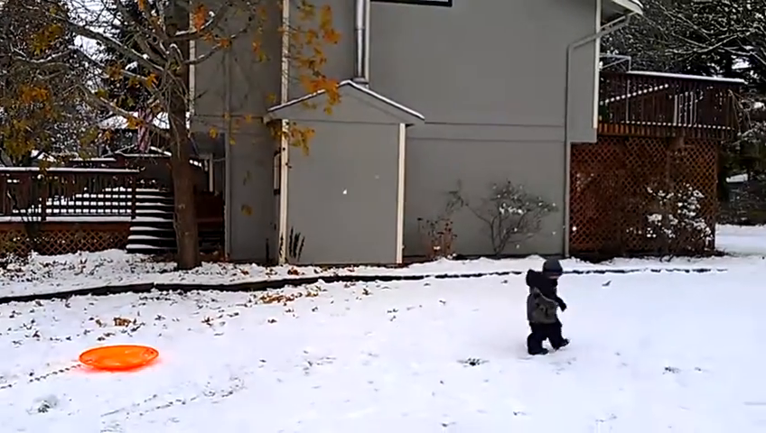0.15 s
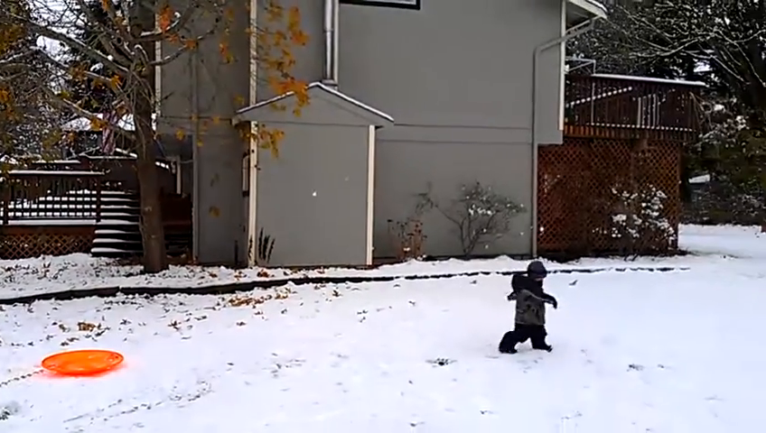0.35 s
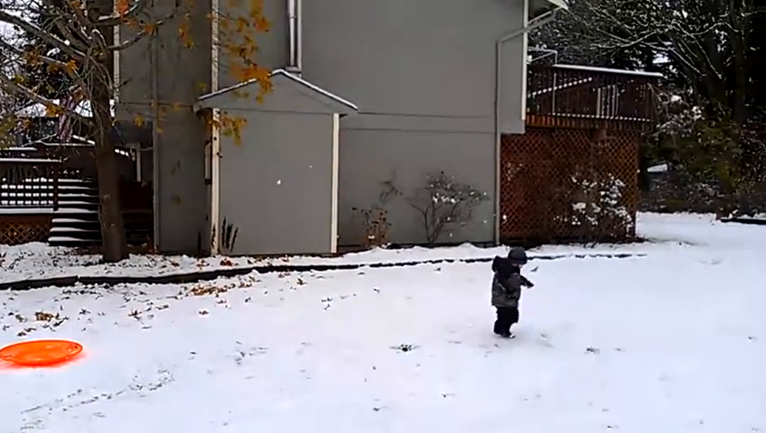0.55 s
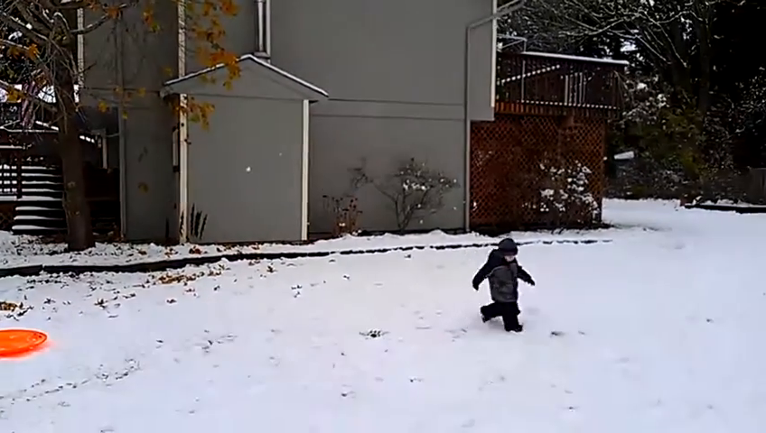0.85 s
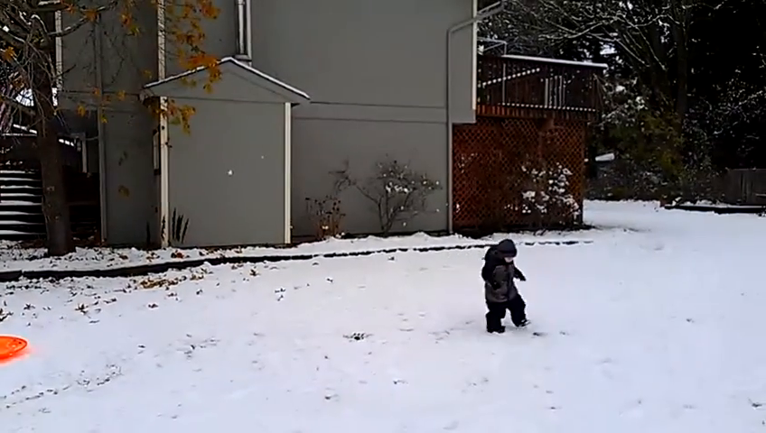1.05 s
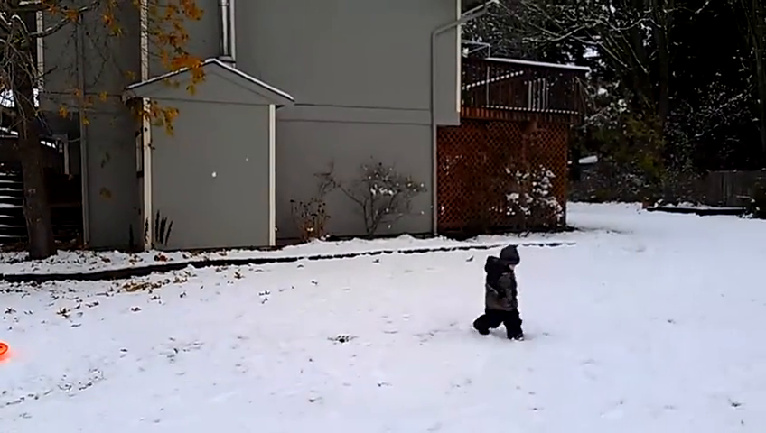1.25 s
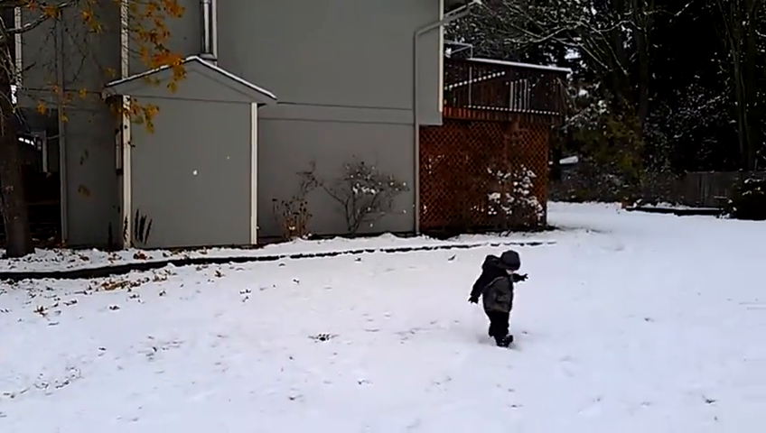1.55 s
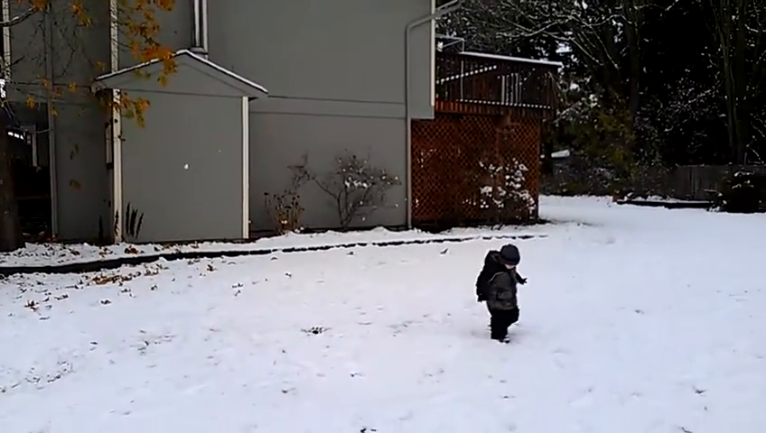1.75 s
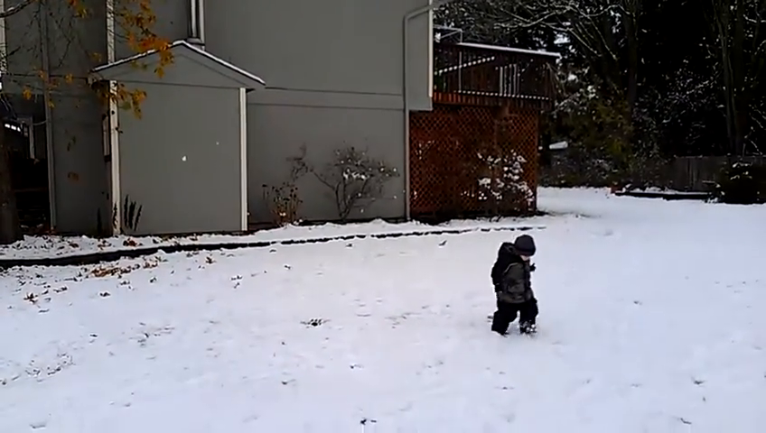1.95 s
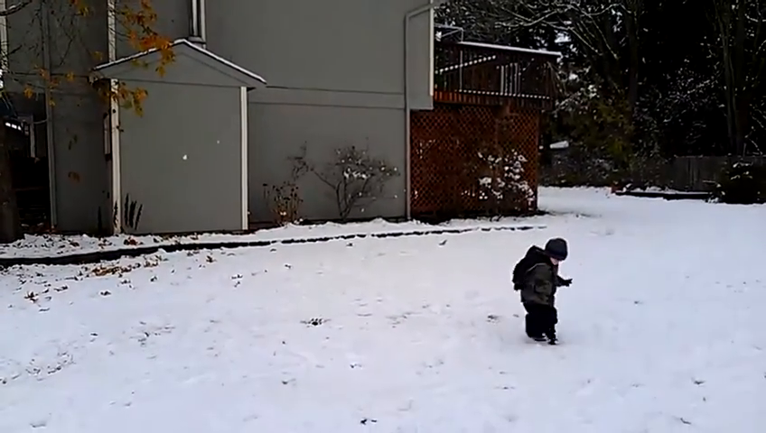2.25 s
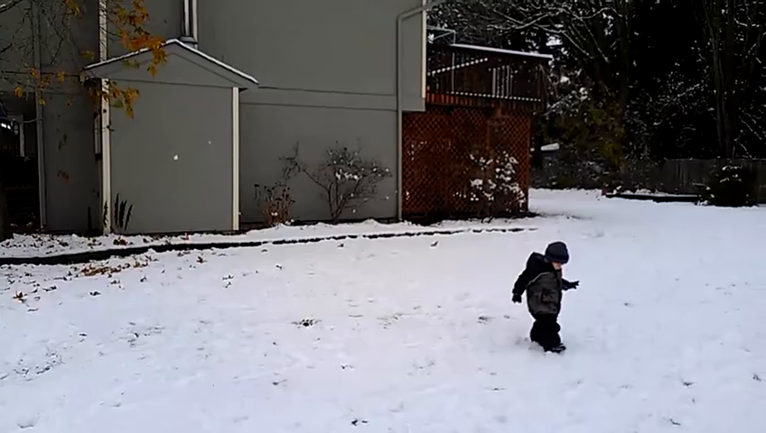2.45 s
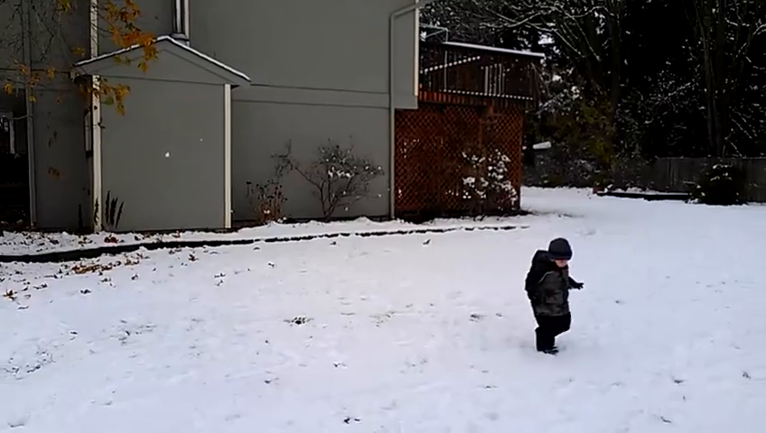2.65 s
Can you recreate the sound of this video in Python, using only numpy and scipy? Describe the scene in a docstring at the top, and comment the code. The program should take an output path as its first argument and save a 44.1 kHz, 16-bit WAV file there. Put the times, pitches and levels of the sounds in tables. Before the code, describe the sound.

Boots press and drag in crisp snow at irregular intervals, crackling and creaking above quiet distant air

```python
"""Uneven footsteps in a snowy yard, close to a hand-held pair of microphones.
Each press or drag of a boot breaks a swarm of tiny ice grains, over the muffled packing of the snow.
Patches of crust collapse in tight bursts, packed snow creaks in narrow bands of noise, and a sole
squeaks in short unsteady tones. A few soft knocks are damped modes; a steady distant outdoor rush
is coloured noise."""
import sys
import numpy as np
from scipy import signal
from scipy.fft import rfft, irfft, next_fast_len
from scipy.io import wavfile
from scipy.ndimage import uniform_filter1d, map_coordinates

SR = 44100
rng = np.random.default_rng(int(sys.argv[2]) if len(sys.argv) > 2 else 0)


def inscribe(sig):
    """Save sig as 16-bit PCM at rate SR to the path in sys.argv[1].

    A 1-D sig is mono; a 2-D sig holds one channel per row.
    Samples are clipped to [-1, 1] before scaling.
    """
    pcm = np.round(np.clip(np.atleast_2d(sig).T, -1, 1) * 32767)
    wavfile.write(sys.argv[1], SR, pcm.astype(np.int16))


N = 123479
T = np.arange(N) / SR  # seconds

# Colour of the coarse crunch of snow. Each row: frequency in Hz, relative level in dB per Hz.
CRUNCH_COLOUR = [(120, -52), (250, -39), (700, -8.5), (1200, -6), (2100, -0.5), (3300, 0.5), (4600, 0.5),
                 (6000, -1.5), (9000, -5.5), (11000, -29.5)]
# How alike the yard and the muffled packing of the snow reach left and right.
# Each row: frequency in Hz, likeness (1 is identical).
WIDE_LIKENESS = [(50, 0.14), (110, .3), (200, 1), (400, 0.71), (800, 0.79), (2000, 0.19), (8000, 0.41)]
# How alike the breaking snow underfoot reaches left and right.
# Each row: frequency in Hz, likeness (1 is identical).
SNOW_LIKENESS = [(400, 0.98), (1500, 1), (3000, 0.28), (4500, 0.56), (6300, 1), (8000, 0.47), (10000, 0.24)]


def amp(db):
    """Decibels to gain."""
    return 10 ** (np.asarray(db) / 20)


def unit(x):
    """Scaled to rms 1."""
    return x / np.sqrt(np.mean(x ** 2) + 1e-20)


def along(points, hz):
    """(Hz, value) points read on a log frequency axis."""
    f, v = np.transpose(points)
    return np.interp(np.log(hz + 1), np.log(f + 1), v)


def wobble(rate):
    """A smooth random curve through normally scattered knots, rate of them a second."""
    return map_coordinates(rng.standard_normal(4096), [T * rate], mode="wrap")


def swell(centre, length):
    """A brief bell-shaped rise and fall, 17 dB down one length either side of its centre."""
    return np.exp(-2 * ((T - centre) / length) ** 2)


def filtered(x, response):
    """x times a response of frequency, padded so that the end does not wrap onto the start."""
    size = next_fast_len(N + SR // 2)
    spectrum = rfft(x, size) * response(np.fft.rfftfreq(size, 1 / SR))
    return irfft(spectrum, size)[..., :N]


def spread(pair, colour, alike):
    """Two unrelated signals mixed as mid and side into a coloured, partly alike left and right of rms 1."""
    def mid_side_response(hz):
        # a wider angle moves energy from mid to side, so left and right grow less alike
        angle = np.arccos(np.clip(along(alike, hz), -1, 1)) / 2
        return colour(hz) * np.array([np.cos(angle), np.sin(angle)])

    mid, side = filtered(pair, mid_side_response)
    return unit(np.array([mid + side, mid - side]))


def yard():
    """Steady distant outdoor rush: noise with a fixed colour and width."""
    # Colour of the yard. Each row: frequency in Hz, relative level in dB per Hz.
    yard_colour = [(40, -18.5), (110, -66), (145, -37), (200, -27.5), (260, -13), (480, -6), (780, 0.5),
                   (1200, -10.5), (2100, -7.5), (5000, -5), (6300, -4), (8700, -7), (10800, -18),
                   (13500, -55)]
    noise = rng.standard_normal((2, N))
    return amp(-57.5) * spread(noise, lambda hz: amp(along(yard_colour, hz)), WIDE_LIKENESS)


def knocks():
    """Soft dull bumps: a quickly damped mode and a shorter overtone, with little below the mode."""
    # Soft knocks among the steps. Each row: start in seconds, pitch in Hz, level in dB before the low cut,
    # time to fall 60 dB in seconds, overtone over mode in dB.
    knock_rows = [(0.2735, 370, -41.5, 0.026, -1), (.711, 555, -31.5, 0.015, -2),
                  (0.7355, 490, -41.5, 0.022, -12), (.954, 407, -47.5, 0.025, -10),
                  (1.275, 280, -54, 0.05, -12), (2.183, 320, -46.5, 0.042, 4),
                  (2.2075, 800, -40, .008, -10), (2.70, 650, -42.5, 0.017, -3)]
    overtone_ratio, overtone_t60_s, attack_s = 2.6, 0.0084, 0.00041
    out = np.zeros(N)
    for start, hz, db, t60, overtone_db in knock_rows:
        t = np.maximum(T - start, 0)
        mode = np.sin(2 * np.pi * hz * t) * np.exp(-np.log(1000) * t / t60)
        overtone = np.sin(2 * np.pi * hz * overtone_ratio * t) * np.exp(-np.log(1000) * t / overtone_t60_s)
        bump = (mode + amp(overtone_db) * overtone) * (1 - np.exp(-t / attack_s))
        low_cut = signal.butter(N=6, Wn=max(250, .64 * hz), btype="high", fs=SR, output="sos")
        out += amp(db) * signal.sosfilt(low_cut, bump)
    return out


def squeaks():
    """The sole sticks and slips evenly: a short tone, slightly unsteady in pitch and level."""
    # Squeaks of the sole. Each row: centre in seconds, length in seconds, pitch in Hz, level in dB.
    squeak_rows = [(1.435, .01, 1950, -54), (1.465, 0.018, 3030, -41.5), (1.48, .005, 3220, -37)]
    jitter, rough_db, wavers_per_s = 0.024, 0.5, 350  # jitter as a fraction of the pitch
    out = np.zeros(N)
    for centre, length, pitch_hz, db in squeak_rows:
        wavering_hz = pitch_hz * (1 + jitter * wobble(wavers_per_s))
        tone = np.sin(2 * np.pi * np.cumsum(wavering_hz) / SR)
        level = amp(db + rough_db * wobble(wavers_per_s))
        out += level * swell(centre, length) * tone
    return out


def patchy(x):
    """The colour of the grains shifts from moment to moment, alike in both streams."""
    patch_db = 1.5
    z = signal.stft(x, nperseg=512)[2]
    field = rng.standard_normal(z.shape[1:])  # frequency by time
    field = uniform_filter1d(field, size=4, axis=0)
    field = uniform_filter1d(field, size=4, axis=1)
    return signal.istft(z * amp(patch_db * unit(field)), nperseg=512)[1][:, :N]


def grains():
    """Two streams of tiny ice fractures of scattered size, with snaps of crust, over smooth sliding powder."""
    grains_per_s, grain_spread_db = 3500, 2
    snaps_per_s, snap_db, powder_db = 140, -8, -1  # levels against the fractures
    breaks = rng.random((2, N)) < grains_per_s / SR
    sizes = amp(grain_spread_db * np.clip(rng.standard_normal((2, N)), -2, 2))
    fractures = breaks * sizes * rng.choice([-1, 1], (2, N))
    snaps = (rng.random((2, N)) < snaps_per_s / SR) * rng.choice([-1, 1], (2, N))
    powder = rng.standard_normal((2, N))
    return patchy(unit(fractures) + amp(snap_db) * unit(snaps) + amp(powder_db) * powder)


def creaks():
    """Grains of packed snow slip under the sole and briefly ring in one narrow band."""
    # Creaks underfoot. Each row: centre in seconds, length in seconds, pitch in Hz,
    # width of the resonance (applied twice) in Hz either side, level in dB.
    creak_rows = [(.216, 0.016, 6360, 350, -48.5), (0.854, 0.027, 1900, 298, -57),
                  (1.025, 0.022, 2310, 300, -50.5), (1.047, .012, 2800, 300, -53),
                  (1.127, 0.059, 6300, 450, -41.5), (1.145, 0.0033, 6400, 500, -35.5),
                  (1.154, .005, 6300, 350, -34), (1.452, 0.024, 1430, 350, -51),
                  (1.96, .018, 6700, 400, -46), (1.992, 0.081, 6050, 160, -47.5)]
    out = np.zeros((2, N))
    for centre, length, pitch_hz, width_hz, db in creak_rows:
        def band(hz):
            damping = 2j * hz * width_hz
            return (damping / (pitch_hz ** 2 - hz ** 2 + damping)) ** 2

        out += amp(db) * swell(centre, length) * spread(grains(), band, SNOW_LIKENESS)
    return out


def collapses():
    """A patch of crust gives way at once: a tight, distinct burst of grains in a band of its own."""
    # Crust breaking under the sole. Each row: centre in seconds, length in seconds,
    # middle of the band in Hz, level in dB.
    collapse_rows = [(.359, .006, 3200, -45), (.377, .005, 7500, -46.5), (.434, .003, 2500, -43),
                     (1.112, .003, 6500, -40), (1.1205, .003, 2600, -39), (1.132, .003, 6800, -38),
                     (1.161, .002, 2000, -45), (1.222, .003, 2500, -49), (1.945, .003, 7000, -44),
                     (1.990, .004, 7000, -42), (2.025, .003, 3000, -44), (2.045, .005, 3200, -43.5),
                     (2.093, .004, 6800, -46), (2.364, .003, 2500, -50)]
    band_octaves = 0.79  # from the middle to where the bell falls to 1/e
    out, ice = np.zeros((2, N)), grains()
    for centre, length, middle_hz, db in collapse_rows:
        def band(hz):
            bell = np.exp(-(np.log2((hz + 1) / middle_hz) / band_octaves) ** 2)
            return bell * amp(along(CRUNCH_COLOUR, hz))

        out += amp(db) * swell(centre, length) * spread(ice, band, SNOW_LIKENESS)
    return out


def packing(power):
    """The snow beneath the sole settles with a muffled sound, lagging behind the crunch."""
    # Colour of packing snow. Each row: frequency in Hz, relative level in dB per Hz.
    packing_colour = [(120, -51), (200, -23), (270, -4.5), (500, -3.5), (800, 2), (1200, -6.5),
                      (2200, -1.5), (4000, -34.5), (9000, -56)]
    growth, release_s = 0.29, 0.064  # exponent on the force of the step; time constant of the power
    settling = np.abs(signal.lfilter([1], [1, -np.exp(-1 / (release_s * SR))], power))
    noise = rng.standard_normal((2, N))
    muffled = spread(noise, lambda hz: amp(along(packing_colour, hz)), WIDE_LIKENESS)
    return amp(-56.5) * unit(np.sqrt(settling) ** growth) * muffled


def pressure(start, rise, hold, fall):
    """Weight builds exponentially on the boot, holds and lets go."""
    before = np.maximum(start - T, 0)
    after = np.maximum(T - start - hold, 0)
    return np.exp(-before / rise - after / fall)


def footsteps():
    """Each press sets off coarse and fine grains, whose roughness rises and falls almost entirely together."""
    # Presses and drags of the boots. Each row: start of the hold in seconds, rise time constant in seconds,
    # hold in seconds, fall time constant in seconds, level of the coarse crunch in dB,
    # fine fizz over coarse crunch in dB.
    press_rows = [ (.01, 0.084, 0.016, 0.2, -56.5, -0.5), (.21, 0.065, .02, 0.22, -51.5, -1.5),
                  (0.356, 0.055, 0.018, 0.052, -44.5, -4), (0.411, 0.014, 0.012, 0.074, -42.3, -27),
                  (0.615, .012, 0.0028, 0.017, -54, 5), (0.656, 0.072, 0.076, 0.093, -51, 1.5),
                  (0.797, 0.033, 0.058, 0.078, -50.5, -4), (0.99, 0.079, 0.073, 0.082, -55, 0),
                  (1.118, 0.029, 0.017, 0.018, -40.5, 4.5), (1.149, 0.0074, 0.01, 0.02, -43.5, 2),
                  (1.174, 0.027, .03, 0.091, -48.5, 1), (1.312, 0.053, 0.017, 0.032, -52.5, 3),
                  (1.459, 0.092, 0.019, 0.025, -44.5, -12), (1.486, 0.026, 0.014, 0.029, -43.5, 2.5),
                  (1.546, 0.025, 0.021, 0.055, -52, 3), (1.623, 0.025, 0.0068, 0.021, -51.5, -15),
                  (1.687, 0.034, 0.074, 0.065, -59.5, 4), (1.957, 0.026, 0.014, 0.039, -45, 4),
                  (1.99, 0.004, 0.0057, 0.023, -44.5, 2), (2.03, 0.028, 0.015, 0.023, -44.5, 1.5),
                  (2.073, 0.023, 0.0095, 0.1, -49, 2), (2.181, 0.013, 0.0032, 0.021, -51.5, 5),
                  (2.262, 0.026, 0.079, 0.07, -61, 9.5), (2.339, 0.028, 0.019, 0.23, -57, 6.5),
                  (2.501, 0.0054, 0.02, 0.023, -56, 6.5), (2.58, 0.027, 0.028, 0.075, -55.5, 2),
                  (2.80, 0.02, .02, .04, -51.5, 3)]
    # Colour of the fine fizz. Each row: frequency in Hz, relative level in dB per Hz.
    fizz_colour = [(300, -55), (2500, -4.5), (5200, -6), (6200, -0.5), (7200, -3.5), (8600, -3),
                   (9500, -10), (10700, -20), (13500, -29.5)]
    clumps_per_s, separate_clump_db, shared_clump_db = 280, -0.1, 0.62
    slips_per_s, slip_db = 65, 0.59  # slower slips
    coarse_power, fine_power = np.zeros(N), np.zeros(N)
    for start, rise, hold, fall, db, fizz_db in press_rows:
        force = amp(db) * pressure(start, rise, hold, fall)
        coarse_power += force ** 2
        fine_power += (force * amp(fizz_db)) ** 2
    together_db = shared_clump_db * wobble(clumps_per_s) + slip_db * wobble(slips_per_s)

    def layer(colour):
        roughness = amp(together_db + separate_clump_db * wobble(clumps_per_s))
        return unit(roughness * spread(grains(), lambda hz: amp(along(colour, hz)), SNOW_LIKENESS))

    crunch = np.sqrt(coarse_power) * layer(CRUNCH_COLOUR)
    fizz = np.sqrt(fine_power) * layer(fizz_colour)
    return crunch + fizz + packing(coarse_power)


def scene():
    """Boots in the snow, leaning further left as the microphones turn, with knocks and the yard behind."""
    drift_db_per_s = 0.4  # left against right
    lean = amp(np.array([[.5], [-.5]]) * drift_db_per_s * (T - T.mean()))
    boots = footsteps() + collapses() + creaks() + squeaks()
    return lean * boots + knocks() + yard()


def record(dry):
    """The two microphones differ in level and phase; nothing is kept above the band limit."""
    # Level between the microphones. Each row: frequency in Hz, left over right in dB.
    balance = [(60, -2), (130, 4), (280, 3.5), (610, 3.5), (1320, 4.5), (2860, 4), (6200, 1), (13400, 5)]
    # Phase between the microphones. Each row: frequency in Hz, lead of the left in radians.
    phase_lead = [(300, 0.07), (800, -0.95), (1600, -1.36), (2400, 0.68), (3100, -0.1), (3700, -0.7),
                  (4800, -2), (5600, -1.58), (6300, -1.1), (7800, -1), (9500, 1.76), (12000, 1.1)]
    top_hz = 13950
    sides = np.array([[.5], [-.5]])  # half of each difference goes to either side

    def microphones(hz):
        level = amp(sides * along(balance, hz))
        phase = np.exp(1j * sides * along(phase_lead, hz))
        return level * phase * (hz < top_hz)

    return filtered(dry, microphones)


dry = scene()
out = record(dry)
inscribe(out)
```